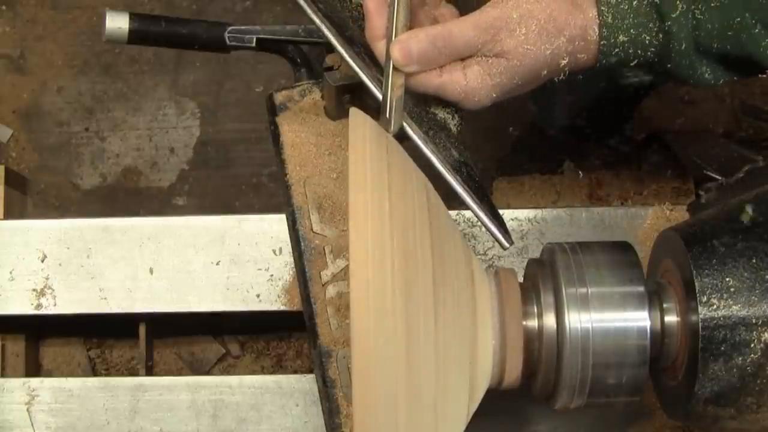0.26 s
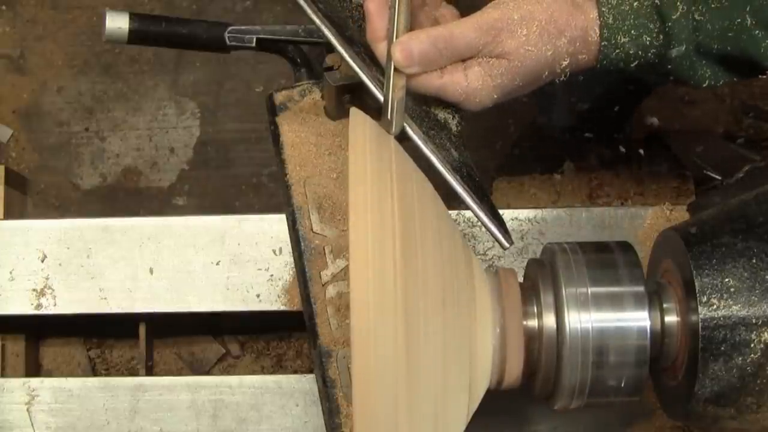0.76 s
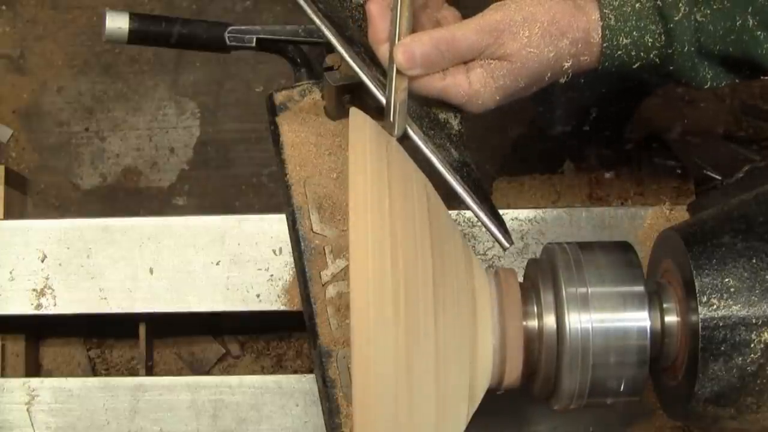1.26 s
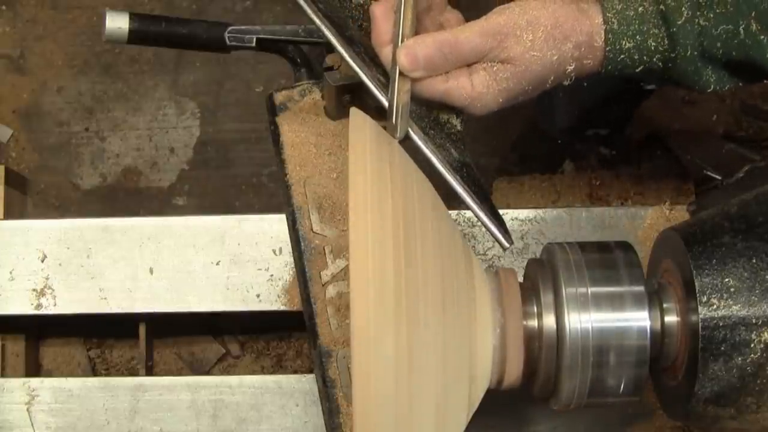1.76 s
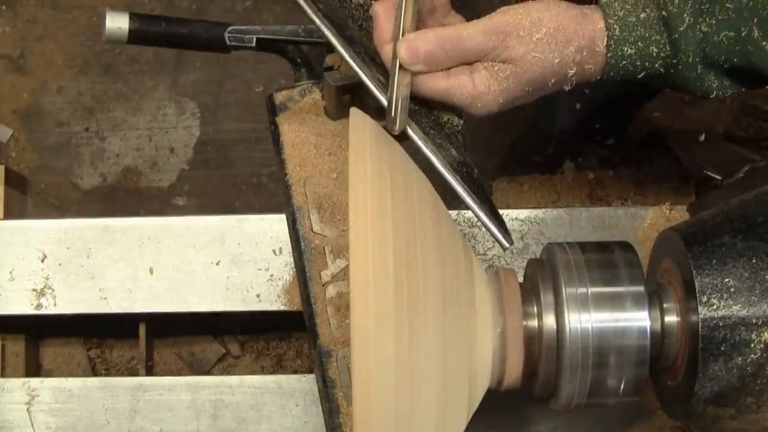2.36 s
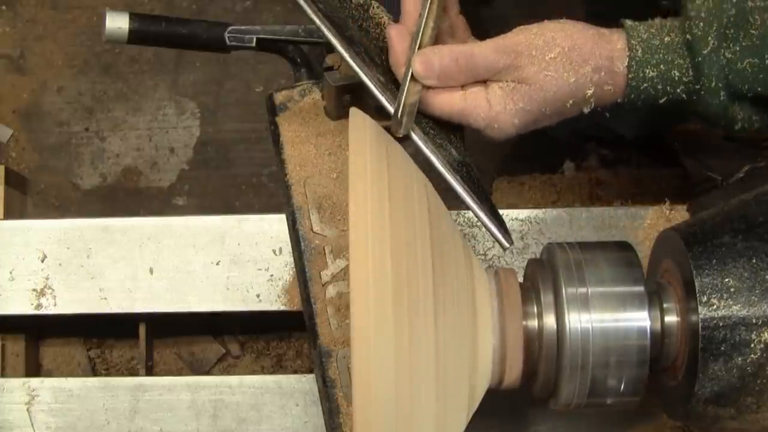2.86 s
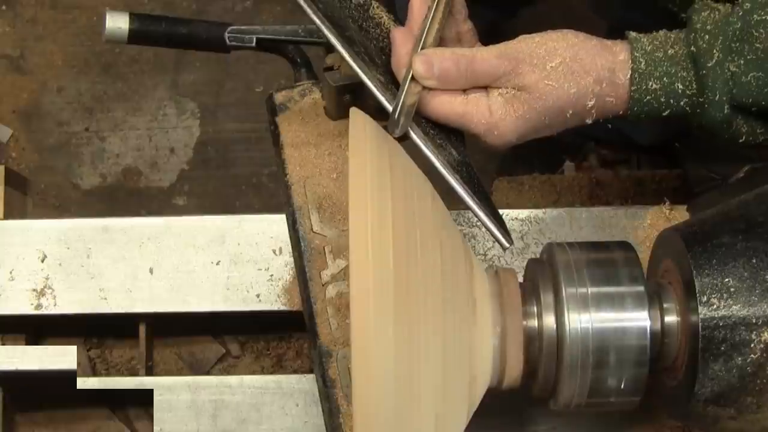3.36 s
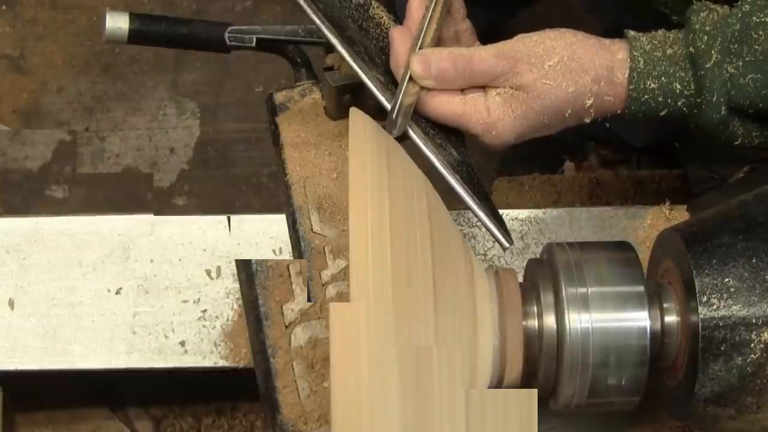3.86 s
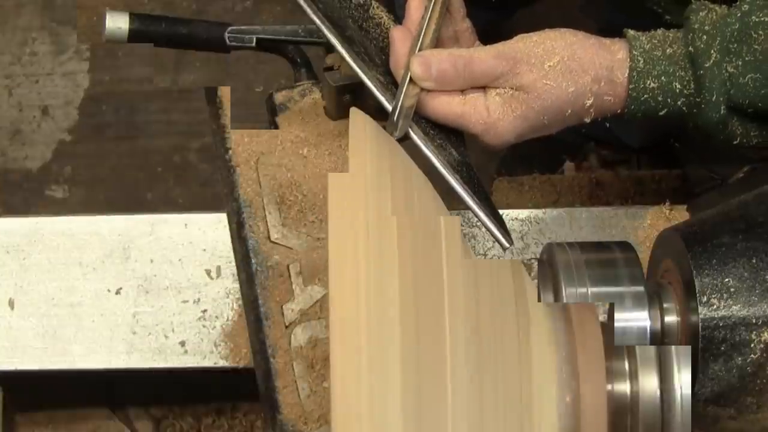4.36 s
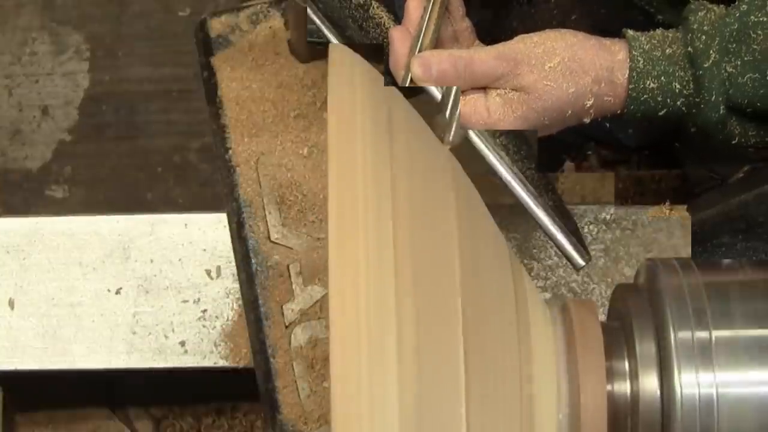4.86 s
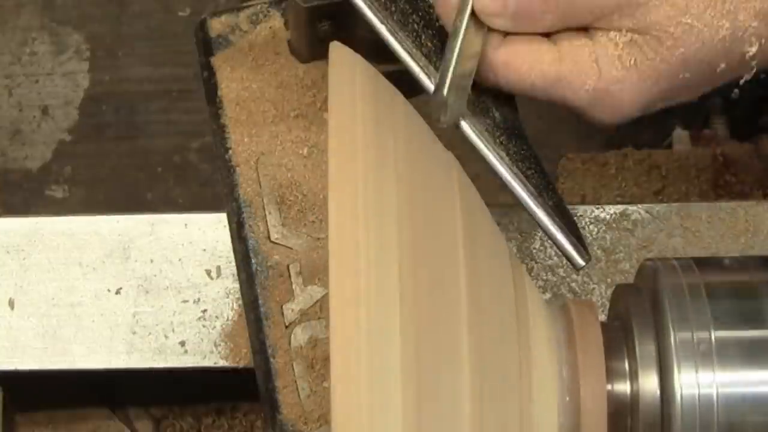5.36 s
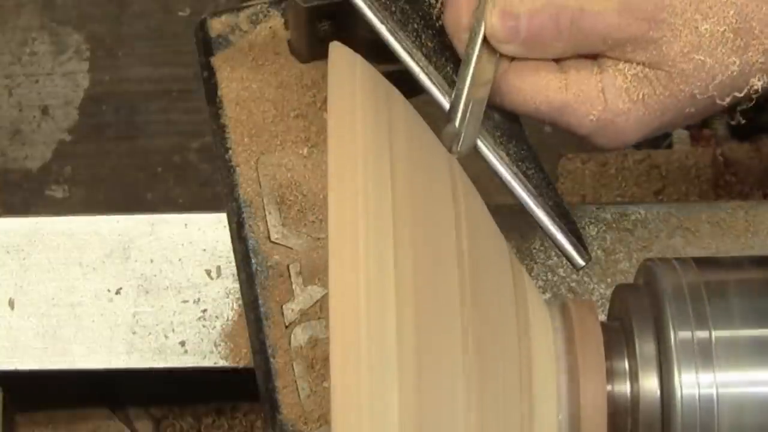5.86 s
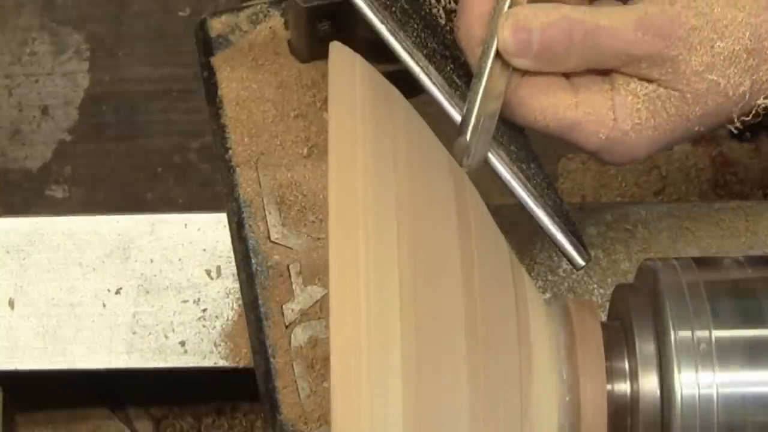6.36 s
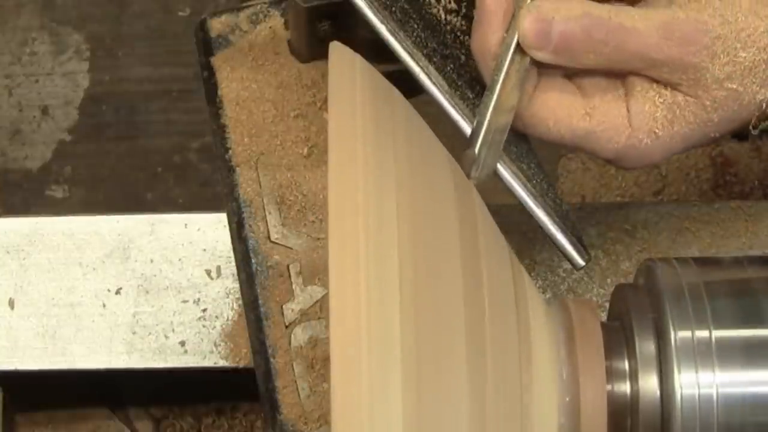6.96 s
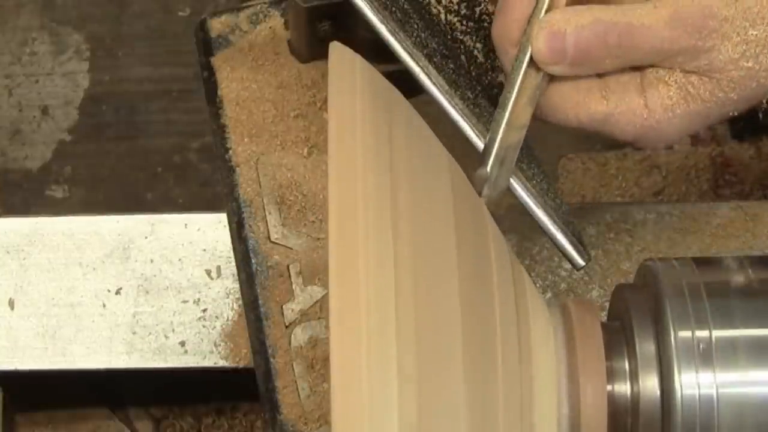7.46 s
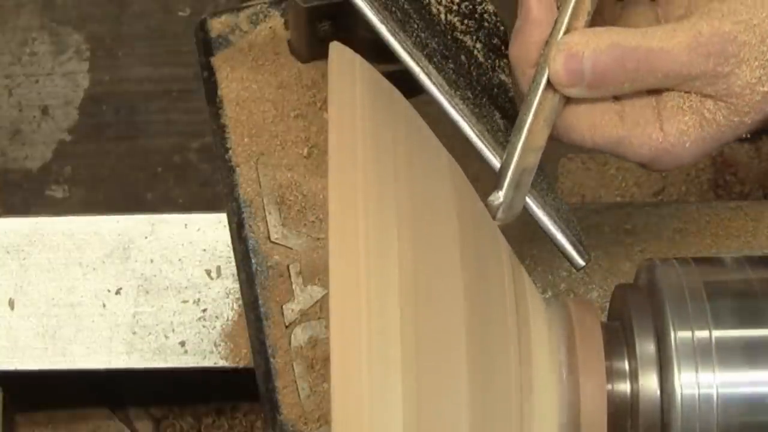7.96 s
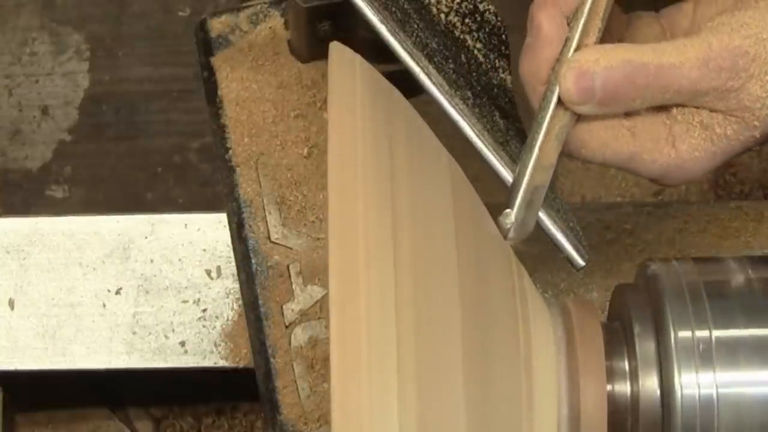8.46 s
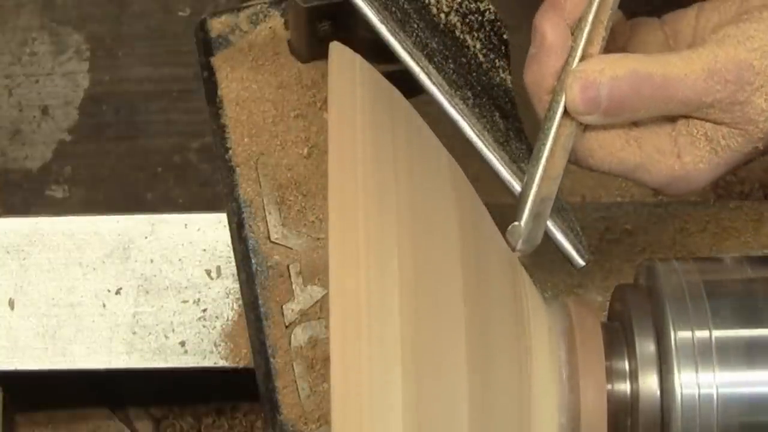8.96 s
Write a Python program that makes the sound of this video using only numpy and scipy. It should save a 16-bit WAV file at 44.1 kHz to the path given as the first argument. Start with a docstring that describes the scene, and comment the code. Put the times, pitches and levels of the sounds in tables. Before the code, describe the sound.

From the start, a gouge cuts a wooden bowl spinning on a lathe, heard close in a workshop with a short echo. The cut is loud: a tearing hiss that flutters rapidly, with small repeating knocks and a hollow ring from the bowl. At about 2.4 seconds it stops, and a quiet motor rush with a high whine comes up. Steel slides briefly over the tool rest at 3 seconds, followed by a soft bump just before 4. The gouge then bites in quick stutters, settling at 4.6 into a lighter, hissing cut. By 5.4 this has faded into much quieter, sped-up cutting: a thin high buzz, sizzle and rustle over a faint hum. A small scuff at 5.5 starts a new stroke. The sizzling continues with a faint whistle until about 9.2, with tiny breaks near 6.1, 6.6 and 8.7 seconds.

```python
"""In a wood shop, a gouge (a curved chisel) shaves a bowl spinning on a lathe at 15 turns a second.
It rides the same ripples on every turn, so the bowl rings while the fibres tear with a hiss.
It lifts off, the motor and its drive whine on, and the gouge slides along its rest and bites again.
This lighter cut fades over into the same work in fast motion: the bowl turns five times as fast,
and the cutting becomes a high buzz and sizzle."""
import sys
import numpy as np
from scipy import signal
from scipy.fft import rfft, irfft, next_fast_len
from scipy.io import wavfile
from scipy.ndimage import uniform_filter1d

SR = 44100
rng = np.random.default_rng(int(sys.argv[2]) if len(sys.argv) > 2 else 0)


def to_wav(sig):
    """Store sig (one row per channel, or 1-D mono) as 16-bit WAV at the path in sys.argv[1].

    Samples outside -1..1 are clipped; the rate is SR.
    """
    pcm = np.clip(np.atleast_2d(sig), -1, 1) * 32767
    pcm = np.round(pcm).astype(np.int16)
    wavfile.write(sys.argv[1], SR, pcm.T)  # frames by channels


N = 406161
TIME = np.arange(N) / SR
HZ = np.maximum(np.arange(N // 2 + 1) * SR / N, 1)

# Levels in the tables are relative: the functions turn them up or down further.
# stereo width of the cutting, the motor and the fast motion: pitch_hz, side_minus_middle_db
CUT_WIDTH = [(60, -20), (110, -11), (200, -16.5), (380, -24), (700, -10.5), (1290, -21), (2380, -32),
             (4400, -15), (8120, -11.5), (15000, 2.5)]
MOTOR_WIDTH = [(60, -10), (110, -12), (200, -2), (380, -3), (700, -14), (1290, -12), (2380, -10),
               (4400, -8), (8120, -0.5), (15000, 14)]
FAST_WIDTH = [(60, -4), (110, -8), (200, -5.5), (380, -7.5), (700, -8), (1290, -8), (2380, -10), (4400, -8),
              (8120, -9.5), (15000, -15)]
# tone colour of the motor's rush at both speeds, and of the room in fast motion: pitch_hz, level_db
MOTOR_AIR = [(30, -53), (80, -18), (300, -17), (620, -8), (900, -14), (1250, -13), (2700, -22.5),
             (3900, -22.5), (5600, -30), (9000, -24.5), (10000, -12.5), (10900, -24.5), (12300, -39),
             (15500, -53)]
FAST_MOTOR_AIR = [(24, -59), (40, -25), (1310, -39), (1450, -11), (1560, -29), (2920, -3), (3140, -11),
                  (3470, -14), (14000, -43), (15500, -13)]
FAST_HISS = [(50, -21), (120, -10), (375, -3.5), (1000, -5), (3000, 0.5), (6000, -4), (15000, -11)]
# the motor's hum and the whine of its drive, at both speeds: pitch_hz, level_db
MOTOR_TONES = [(646, -62.5), (9464, -82), (9679, -73.5), (9895, -63.5), (10034, -73.5), (10110, -68.5),
               (10180, -87), (10971, -80.5)]
FAST_MOTOR_TONES = [(1464, -82), (2541, -84), (3225, -80.5), (6282, -91)]
# tone colour of steel sliding on steel: pitch_hz, level_db
SLIDE_COLOUR = [(100, -19), (350, -7), (650, -0.5), (1100, 0.5), (2000, -6.5), (4200, -7.5), (8000, -10),
                (11000, -17), (15000, -30)]

# drag on the edge, which meets end grain (the fibres' ends) twice a turn: share_of_turn, drag_db
GRAIN_DRAG = [(0, 2.5), (.12, 1), (.18, -0.5), (.27, -6), (.33, 3), (.45, 3), (.56, 0.3), (.64, -5.5),
              (.79, -4.5), (.86, 0.8)]
# the mounted wood's boom, the bowl's low and higher notes, a bright ring: pitch_hz, width_hz, level_db
BOOM_MODES = [(159, 17, -12), (191.4, 14.2, 1), (225, 34, -18.5)]
BOWL_MODES = [(359, 13, -5.5), (389, 4.9, -9.5), (418.7, 9.9, 0.5), (448.6, 8, -9), (620, 68, -25),
              (697, 26, -9), (748, 22, -4), (799, 14.5, 2), (847.3, 21, 5.5), (912, 9, -5.5), (972, 9, -15)]
UPPER_BOWL_MODES = [(1154, 107, -11), (1271, 40, -4.5), (1326.6, 27, 3.5), (1757, 94, 2.5), (2020, 350, -7),
                    (2416, 79, -5)]
EDGE_MODES = [(2908, 116, 2.5), (3850, 220, -5.5), (4260, 220, 0), (4640, 170, 1.5), (5620, 130, 1),
              (6520, 380, -4.5), (7420, 330, -3), (8320, 450, -3.5), (9050, 180, -8.5)]
# notes of the bowl's wall: pitch_hz, width_hz, loudest_at_s, level_db, fall_either_side_db_per_s
WALL_MODES = [(702, 24, 0.62, -47.5, 16), (602, 110, 2.2, -52.5, 10), (867, 7.3, 1.34, -50.5, 6)]
# tone colour of tearing fibres in the heavy and the light cut: pitch_hz, level_db
HEAVY_SHAVINGS = [(110, -45), (200, -15), (310, -12), (560, -7), (1050, -1), (1480, -7.5), (2200, -6.5),
                  (2700, -3), (3400, -0.5), (4600, -2.5), (6000, -3), (9000, -3), (12000, -12),
                  (15500, -27.5)]
LIGHT_SHAVINGS = [(80, -38), (200, -10), (300, -11.5), (600, -6), (1050, -3.5), (1480, -8), (2600, 0.5),
                  (3600, 2.5), (4600, 2.5), (6400, 2.5), (10000, 0), (12500, -7), (15500, -19)]
# loudness through the heavy cut: time_s, shavings_db, upper_bowl_db, bowl_db, boom_db
HEAVY_LEVELS = [(0.03, -37, -38, -38.5, -64), (0.2, -38.5, -39, -39, -65), (0.38, -37.5, -36.5, -38, -63.5),
                (0.6, -39.5, -41, -39.5, -60.5), (0.8, -40, -42, -39, -59), (0.96, -37.5, -39, -40, -60),
                (1.12, -38.0, -41, -39.5, -62.5), (1.26, -36, -39, -41.5, -61),
                (1.5, -36.5, -38, -40.5, -60), (1.7, -39.5, -40.5, -38.5, -61.5),
                (2.05, -37.5, -41.5, -36, -54), (2.33, -41, -39, -37.5, -54)]
# hard spots in the wood: loudest_at_s, half_length_s, share_of_turn, low_db, middle_db, high_db
HARD_SPOTS = [(0.447, 0.32, .24, -35.5, -51, -40), (0.902, 0.48, .37, -45.5, -38, -38.5),
              (1.264, 0.21, 0.48, -37.5, -35.5, -34.5), (1.75, 0.52, .86, -36.5, -36, -30.5),
              (2.24, 0.23, .43, -39.5, -38.5, -34)]
# the bowl's low, middle and high note in a knock: pitch_hz, rise_s
KNOCK_MODES = [(848, 0.0085), (1329, 0.0067), (1768, .0038)]
# separate bites into the end grain: start_s, shavings_db, bowl_db, boom_db
BITES = [(4.047, -36, -54, -55), (4.080, -34.5, -48, -59), (4.113, -36, -46.5, -53.5),
         (4.147, -34.5, -47.5, -62), (4.179, -36.5, -52, -58), (4.213, -45, -67, -72),
         (4.281, -44.5, -61, -76), (4.315, -48.5, -54.5, -77), (4.384, -48.5, -61, -78),
         (4.415, -36, -55, -69), (4.447, -36.5, -49, -60), (4.482, -42.5, -58, -68),
         (4.514, -32.5, -45, -58), (4.548, -34.5, -46, -61), (4.649, -43, -60, -68), (4.781, -38, -56, -68)]
# loudness once the light cut settles: time_s, shavings_db, bowl_db, boom_db, dip_between_catches_db
LIGHT_LEVELS = [(4.59, -36, -56, -65, 9.5), (4.75, -35, -51.5, -64, 7), (4.9, -34, -48.5, -67, 6.5),
                (5.05, -35, -53, -63, 4.5), (5.3, -34, -47.5, -65, 6.5)]

# strokes of the gouge in fast motion: start_s, end_s, entry_s, buzz_db, sizzle_db, fizz_db, swell_db
FAST_PASSES = [(3.346, 5.132, .01, -59.5, -70, -66, 2), (5.542, 6.105, .004, -68.5, -66.5, -63.5, 12),
               (6.164, 6.536, 0.021, -63.5, -60.5, -61, 2.5), (6.671, 6.695, 0.0043, -65.5, -62.5, -60, -2),
               (6.696, 8.66, 0.032, -69.5, -60, -64, 2.5), (8.688, 9.25, .005, -67.5, -58, -64, 0.5)]
# how hard the hand leans on the gouge: time_s, level_db
FAST_LEAN = [(5.1, -2), (5.55, -3), (5.66, 1), (5.74, -4.5), (5.85, 0.5), (6.05, 2), (6.2, -2), (6.43, 1),
             (6.53, -2), (6.69, -6.5), (6.8, 0.5), (6.96, -0.5), (7.15, 2.8), (7.28, 1.5), (7.4, 1.5),
             (7.53, -1), (7.68, 3.5), (7.78, 1), (7.9, 0.5), (8.3, 1), (8.42, -1.5), (8.63, 1.5),
             (8.76, -7), (8.95, -1), (9.2, -1)]
# tone colours of the fast cutting: pitch_hz, level_db
FAST_RUSTLE = [(25, -3.5), (100, -2.5), (1000, -1), (1500, -2.5), (2400, -0.5), (5000, -1), (8000, -1.5),
               (15500, -1)]
FAST_SIZZLE = [(5500, -48), (6500, -11.5), (8200, -17), (8750, -2), (9400, -7), (10350, 0.5), (11400, 0.5),
               (12000, -15), (13000, -30)]
FAST_FIZZ = [(10500, -47), (12000, -9), (13200, -3), (13650, -9), (14200, 3), (15000, 3), (15700, -10)]
# ringing that shapes the fast buzz: pitch_hz, width_hz, level_db
FAST_BUZZ_MODES = [(1835, 210, -5.5), (2060, 49, -5.5), (3770, 610, -2), (4866, 60, -5), (5016, 36, -9)]
# the bowl singing in fast motion: pitch_hz, loudest_at_s, level_db, fall_either_side_db_per_s
FAST_RING = [(900, 6.2, -80, 1.5), (2085, 6.2, -71.5, 6.5), (1000, 9.2, -79.5, 7)]
# the bowl's main note, raised to a whistle in fast motion: time_s, level_db
FAST_BOWL_WHISTLE = [(5.56, -69), (5.75, -81), (6.05, -67.5), (6.3, -65), (6.36, -72), (6.5, -61),
                     (6.68, -73), (7.16, -71), (7.55, -78), (7.9, -74), (9.2, -73)]
# the edge landing on the wood: start_s, level_db
TOUCHES = [(5.425, -62), (5.544, -53), (6.174, -66), (6.674, -64), (8.689, -68)]

TURNS_HZ, FAST_TURNS_HZ = 14.95, 74.85
LIFT_S, EXIT_S = 2.362, 0.031   # when the gouge lifts off; how quickly the light cut lets go
FADE_FROM_S, FADE_TO_S = 3.02, 5.36   # normal speed fades over into fast motion


def from_db(db):
    """Turn decibels into a number to multiply by."""
    return np.exp(np.asarray(db) * (np.log(10) / 20))


def rms_one(x):
    """Scale a signal to an average strength (rms) of 1."""
    return x / np.sqrt(np.mean(x ** 2) + 1e-20)


def white():
    """Two separate streams of plain hiss."""
    return rng.standard_normal((2, N))


def drift(rate_hz):
    """A smooth random wander of strength 1."""
    count = int(TIME[-1] * rate_hz) + 2
    return rms_one(np.interp(TIME * rate_hz, np.arange(count), rng.standard_normal(count)))


def in_time(rows):
    """One curve over time for each column after the first."""
    times, *columns = np.transpose(rows)
    return [np.interp(TIME, times, column) for column in columns]


def hump(middle_s, half_s):
    """A bell-shaped rise and fall."""
    return np.exp(-np.minimum(((TIME - middle_s) / half_s) ** 2, 20))


def contact(start, end, entry_s, exit_s):
    """The edge enters the wood, stays and leaves: a gain from 0 to 1."""
    return np.clip((TIME - start) / entry_s, 0, 1) * np.exp(-np.clip((TIME - end) / exit_s, 0, 20))


def colour(points):
    """A gain for every pitch, drawn through the given points."""
    hz, db = np.transpose(points)
    return from_db(np.interp(np.log(HZ), np.log(hz), db))


def resonances(modes):
    """A gain for every pitch, peaking at the modes: the pitches at which a thing likes to ring."""
    peaks = (from_db(db) / (1 + (2 * (HZ - hz) / width) ** 2) for hz, width, db in modes)
    return np.sqrt(sum(peak ** 2 for peak in peaks))


def radiate(force, response, width):
    """Colour two forces into the middle (strength 1) and the sides of a stereo sound."""
    size = next_fast_len(N, True)
    bins = np.arange(size // 2 + 1) * SR / size
    shape = np.array([np.interp(bins, HZ, gain) for gain in (response, response * colour(width))])
    mid, side = irfft(rfft(force.astype(np.float32), size) * shape.astype(np.float32), size)[:, :N]
    return np.array([mid + side, mid - side]) / np.std(mid)


def tones(lines, waver_hz, flutter_db, spread):
    """Pure tones that waver a little and reach the two ears out of step."""
    out = 0
    for hz, db in lines:
        phase = 2 * np.pi * np.cumsum(hz + waver_hz * drift(12)) / SR
        level = np.sqrt(2) * from_db(db + flutter_db * drift(22))
        out = out + level * np.sin(phase + spread * np.array([[1], [-1]]))
    return out


def workshop(x, echo_s=0.35, echo_db=-16):
    """Nearby walls and machine parts add a short echo."""
    age = TIME[:SR // 2]
    tail = rng.standard_normal((2, len(age))) * from_db(-60 * age / echo_s) * (age > .003)
    tail /= np.sqrt(np.sum(tail ** 2, axis=1, keepdims=True))
    return x + from_db(echo_db) * signal.fftconvolve(x, tail, axes=1)[:, :N]


def motor(recover_s=0.37):
    """The steady motor's rush, hum and whine sound quiet under the loud cut, then the level rises."""
    air = from_db(-60) * radiate(white(), colour(MOTOR_AIR), MOTOR_WIDTH)
    whine = tones(MOTOR_TONES, waver_hz=0.63, flutter_db=0.5, spread=0.13)
    # a set curve that imitates an automatic volume control recovering
    recovery = 1 - np.exp(-np.maximum(TIME - LIFT_S, 0) / recover_s)
    dip_db = 2.4 * contact(BITES[0][0], FADE_TO_S, 0.18, EXIT_S)   # softer behind the light cut
    level = from_db(-33) + recovery * from_db(1.5 - dip_db)
    return level * (air + whine) * from_db([[.9], [-.9]])


def fast_motor():
    """The machine's hum in fast motion, with a soft hiss; the level sinks at the second stroke."""
    air = from_db(-88) * radiate(white(), colour(FAST_MOTOR_AIR), FAST_WIDTH)
    hiss = from_db(-76.5) * radiate(white(), colour(FAST_HISS), FAST_WIDTH)
    hum = tones(FAST_MOTOR_TONES, waver_hz=2.95, flutter_db=-1.0, spread=0.61)
    return from_db(np.interp(TIME, [5.55, 5.7], [0, -4])) * (air + hiss + hum)


def slide():
    """Steel rubs over steel as the gouge is moved along the rest."""
    rubbing = white() * from_db(0.83 * drift(400))
    level = from_db(-46) * hump(middle_s=3.018, half_s=0.059)
    return level * radiate(rubbing, colour(SLIDE_COLOUR), CUT_WIDTH)


def bump(start_s=3.958, pitch_hz=245, decay_s=0.014):
    """A soft bump as the gouge is set down on the rest."""
    age = np.clip(TIME - start_s, 0, 1)
    return from_db(-53) * np.exp(-age / decay_s) * np.sin(2 * np.pi * pitch_hz * age)


def touches(decay_s=0.0072):
    """A short bright scuff as the edge lands in fast motion."""
    level = sum(from_db(db) * (TIME >= s) * np.exp(-np.abs(TIME - s) / decay_s) for s, db in TOUCHES)
    return from_db(-2.5) * level * radiate(white(), colour(FAST_RUSTLE), FAST_WIDTH)


def ripples(turns_hz, renew_hz, uneven_db=0, paired_db=0, waver_db=0):
    """Ripples in the wood pass the edge on every turn; those above renew_hz are cut anew each time."""
    period = round(SR / turns_hz)
    per_turn = np.arange(period // 2 + 1)
    # grain looks alike from opposite sides: paired_db above 0 favours even numbers of ripples per turn
    depth = from_db(uneven_db * rng.standard_normal(len(per_turn)) + paired_db * (-1) ** per_turn)
    renewal = np.clip(per_turn * turns_hz / renew_hz, .12, 3)
    steps = rng.standard_normal((2, N // period + 1, len(per_turn))) * renewal
    phase = rng.uniform(0, 2 * np.pi, (2, 1, len(per_turn))) + np.cumsum(steps, axis=1)
    growth = rms_one(uniform_filter1d(rng.standard_normal(steps.shape[1:]), 6, axis=0, mode="wrap"))
    each_turn = irfft(depth * from_db(waver_db * growth) * np.exp(1j * phase), period)
    return rms_one(each_turn.reshape(2, -1)[:, :N])


def grain_db(turns, rings_db, count=30):
    """End grain and the finer growth rings drag on the edge in the same order on every turn."""
    share, db = np.transpose(GRAIN_DRAG)
    rings = np.interp(turns, np.arange(count) / count, rms_one(rng.standard_normal(count)), period=1)
    return np.interp(turns, share, db, period=1) + rings_db * rings


def snaps(per_s, decay_s):
    """Fibres snap at random: each burst starts at once and dies away; average power 1."""
    bursts = (rng.random(N) < per_s / SR) * rng.exponential(1, N)
    power = signal.lfilter([1], [1, -np.exp(-1 / (decay_s * SR))], bursts)
    return power / power.mean()


def shavings(force, response, shift_db=2.0, bands_per_octave=2.3, count=3):
    """Every shaving has its own colour: sets of pitch bands swell and sink separately."""
    out = 0
    for k in range(count):
        bands = response * (1 + np.cos(2 * np.pi * (bands_per_octave * np.log2(HZ) + k / count)))
        swell = from_db(shift_db * drift(35))
        out = out + np.linalg.norm(bands) * radiate(force * swell, bands, CUT_WIDTH)
    return out / np.std(out.mean(axis=0))


def bowl_wall():
    """As the edge travels, it wakes the notes of the bowl's wall one after another."""
    force = ripples(TURNS_HZ, renew_hz=1460, waver_db=2.0)
    out = 0
    for hz, width, loudest_s, db, fall in WALL_MODES:
        level = from_db(db - fall * np.abs(TIME - loudest_s))
        out = out + level * radiate(force, resonances([(hz, width, 0)]), CUT_WIDTH)
    return out


def knocks(turns):
    """Each hard spot strikes the edge once a turn; three notes of the bowl swell and ring out."""
    out = np.zeros(N)
    for loudest_s, half_s, share, *notes_db in HARD_SPOTS:
        age = (turns - share) % 1 / TURNS_HZ
        strength = hump(loudest_s, half_s) * from_db(.8 * drift(13))
        for (hz, rise_s), db in zip(KNOCK_MODES, notes_db):
            level = strength * from_db(db) * age / rise_s * np.exp(1 - age / rise_s)
            out += level * np.sin(2 * np.pi * (hz * age + rng.random()))
    return workshop(np.array([out, out]))


def cut(gains, drag_db, shavings_colour, snap_share, renew_hz, bowl_share, dull_db, edge_db):
    """Ripples make the mounted wood boom and the bowl ring while fibres tear in bursts."""
    boom_gain, bowl_gain, upper_gain, shavings_gain = gains
    force = ripples(TURNS_HZ, renew_hz, waver_db=2.16)
    push = force * from_db(bowl_share * drag_db)
    boom = radiate(push, resonances(BOOM_MODES), CUT_WIDTH)
    dulling = from_db(-dull_db * np.log2(np.clip(HZ, 300, 1200)))   # a light touch favours low notes
    bowl = radiate(push, resonances(BOWL_MODES) * dulling, CUT_WIDTH)
    upper_bowl = radiate(force * from_db(0.54 * drag_db), resonances(UPPER_BOWL_MODES), CUT_WIDTH)
    tearing = np.sqrt(1 + snap_share * snaps(per_s=780, decay_s=0.0018))
    fibres = ripples(TURNS_HZ, renew_hz=2910, uneven_db=3.0, paired_db=0.5) * from_db(drag_db) * tearing
    edge_ring = from_db(edge_db) * resonances(EDGE_MODES)
    hiss = shavings(fibres, np.hypot(colour(shavings_colour), edge_ring))
    wood = (boom_gain * boom + bowl_gain * bowl) * from_db([[.5], [-.5]])
    # a small bowl gives off no deep bass
    wood = signal.sosfilt(signal.butter(4, 120, "high", fs=SR, output="sos"), wood)
    return wood + workshop(upper_gain * upper_bowl + shavings_gain * hiss)


def hand_pressure(treble_share=0.31):
    """The hand leans in and eases off in fast motion: gains of ring, rustle, buzz, sizzle and fizz."""
    lean_db, = in_time(FAST_LEAN)
    gains = np.zeros((4, N))
    for start, end, entry_s, buzz_db, sizzle_db, fizz_db, swell_db in FAST_PASSES:
        press = contact(start, end, entry_s, exit_s=0.0093)
        sizzle = from_db(sizzle_db + swell_db * np.interp(TIME, [start, end], [-.5, .5]))
        gains += [press, press * from_db(buzz_db - 3), press * sizzle, press * from_db(fizz_db)]
    press, buzz, sizzle, fizz = gains
    lean, treble = from_db(lean_db), from_db(treble_share * lean_db)
    return press * treble, press * lean * from_db(-60.5), buzz * lean, sizzle * treble, fizz * treble


def fast_cut():
    """In fast motion the turns blur into a thin ring, buzz, sizzle and fizz over an even rustle."""
    ring_gain, rustle_gain, buzz_gain, sizzle_gain, fizz_gain = hand_pressure()
    drag = from_db(0.5 * grain_db(FAST_TURNS_HZ * TIME, rings_db=-2.5) + 0.66 * drift(60))
    tearing = np.sqrt(1 + 0.28 * snaps(per_s=500, decay_s=0.0012))
    rustle = radiate(white() * drag * tearing, colour(FAST_RUSTLE), FAST_WIDTH)
    chatter = ripples(FAST_TURNS_HZ, renew_hz=4200, uneven_db=-1.0, paired_db=-5.0, waver_db=3.0)
    buzz = from_db(2 * drift(35)) * radiate(chatter, resonances(FAST_BUZZ_MODES), FAST_WIDTH)
    fine_ripples = drag * ripples(FAST_TURNS_HZ, renew_hz=11060, uneven_db=3.0, waver_db=2.0)
    sizzle = from_db(1.4 * drift(14)) * radiate(fine_ripples, colour(FAST_SIZZLE), FAST_WIDTH)
    fizz = from_db(0.98 * drift(14)) * radiate(fine_ripples, colour(FAST_FIZZ), FAST_WIDTH)
    ring = 0
    for hz, loudest_s, db, fall in FAST_RING:
        note = tones([(hz, db)], waver_hz=0.00354 * hz, flutter_db=3.0, spread=0.11)
        ring = ring + from_db(-fall * np.abs(TIME - loudest_s)) * note
    whistle_gain = from_db(in_time(FAST_BOWL_WHISTLE)[0] + 1.7 * drift(22))
    whistle = whistle_gain * radiate(white(), resonances([(4255, 72, 0)]), FAST_WIDTH)
    singing = ring_gain * (whistle + drag * ring)
    scraping = rustle_gain * rustle + buzz_gain * buzz + sizzle_gain * sizzle + fizz_gain * fizz
    return (singing + scraping) * from_db(0.23 * drift(7.8))


def light_cut(settle_s=4.582, entry_s=0.0035, bite_hold_s=0.0096, catch_s=0.0075):
    """The edge stutters onto the end grain in separate bites, then settles into a smoother cut."""
    shavings_db, bowl_db, boom_db, depth_db = in_time(LIGHT_LEVELS)
    since_catch = (TIME - settle_s) % (.5 / TURNS_HZ)   # end grain catches twice a turn and lets go
    catch = np.clip(since_catch / 0.0025, 0, 1) * np.clip(1 - (since_catch - catch_s) / 0.015, 0, 1)
    dip_db = depth_db * (catch - 1) + 0.69 * drift(110)
    steady = contact(settle_s, FADE_TO_S, entry_s, EXIT_S)
    power = (steady * from_db([boom_db, bowl_db + 0.2 * dip_db, shavings_db + dip_db])) ** 2
    age = TIME[:SR // 4]
    fall_s = np.array([[0.034], [0.044], [0.017]])   # boom and bowl ring longer than the fibres tear
    bite = np.minimum(age / entry_s, 1) * np.exp(-np.maximum(age - bite_hold_s, 0) / fall_s)
    for start_s, tear_db, knock_db, thump_db in BITES:
        start = int(start_s * SR)
        power[:, start:start + len(age)] += (from_db([[thump_db], [knock_db], [tear_db]]) * bite) ** 2
    boom_gain, bowl_gain, shavings_gain = np.sqrt(power)
    upper_gain = from_db(-6.25) * np.sqrt(bowl_gain * shavings_gain)
    gains = boom_gain, bowl_gain, upper_gain, shavings_gain
    return cut(gains, 0, LIGHT_SHAVINGS, snap_share=0.42, renew_hz=1470,
               bowl_share=0, dull_db=2.5, edge_db=6.5)


def heavy_cut(lift_takes_s=0.034, die_db_per_s=188):
    """The edge stays deep in the wood; as it lifts, the tearing stops quickly and the ring dies away."""
    shavings_db, upper_db, bowl_db, boom_db = in_time(HEAVY_LEVELS)
    since_lift = np.maximum(TIME - LIFT_S, 0)
    ringing = from_db(-die_db_per_s * np.minimum(since_lift, 1))
    cutting = ringing * from_db(-8.5 * np.minimum(since_lift / lift_takes_s, 1))
    gains = (ringing * from_db(boom_db - 0.3), ringing * from_db(bowl_db - 1.5),
             cutting * from_db(upper_db - 2.5), cutting * from_db(shavings_db + 0.5))
    turns = TURNS_HZ * TIME + 0.15
    drag_db = 0.98 * grain_db(turns, rings_db=-0.06) + 0.19 * drift(25)
    notes = ringing * bowl_wall() + cutting * knocks(turns)
    return notes + cut(gains, drag_db, HEAVY_SHAVINGS, snap_share=0.53, renew_hz=2330,
                       bowl_share=0.12, dull_db=0, edge_db=2.0)


def scene():
    """The work at normal speed fades over into the work in fast motion."""
    fade = np.interp(TIME, [FADE_FROM_S, FADE_TO_S], [0, 1])
    normal = heavy_cut() + light_cut() + motor() + slide() + bump()
    fast = fast_cut() + fast_motor() + touches()
    return np.cos(np.pi / 2 * fade) * normal + fade * fast


def record(dry):
    """The very highest treble is cut off steeply."""
    cutoff_hz = 15720
    return signal.sosfilt(signal.ellip(12, .1, 80, cutoff_hz, fs=SR, output="sos"), dry)


dry = scene()
out = record(dry)
to_wav(out)
```